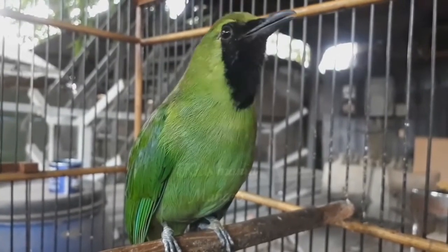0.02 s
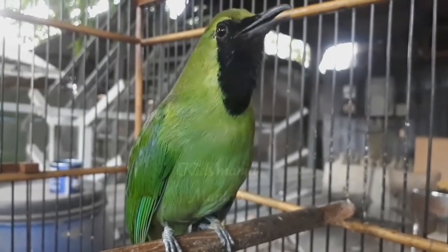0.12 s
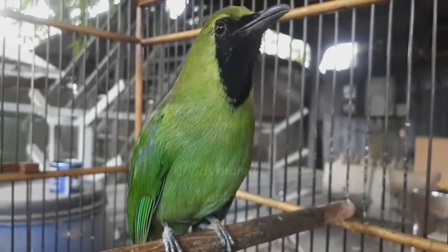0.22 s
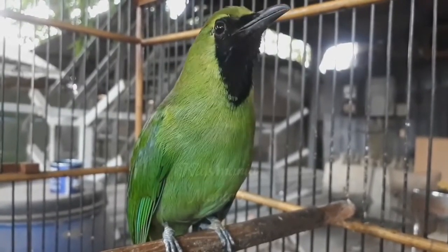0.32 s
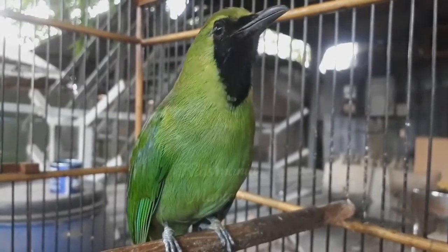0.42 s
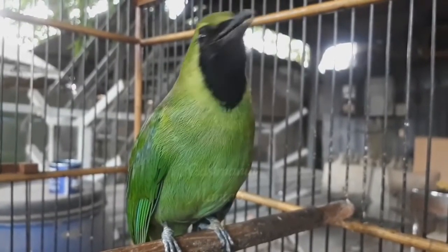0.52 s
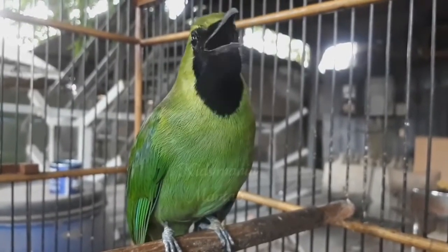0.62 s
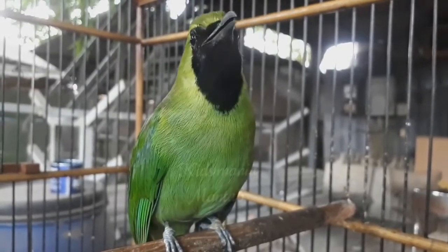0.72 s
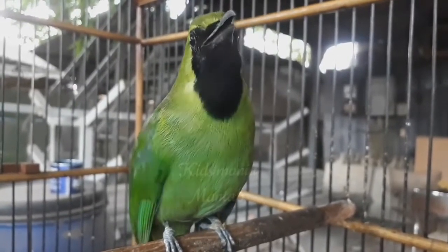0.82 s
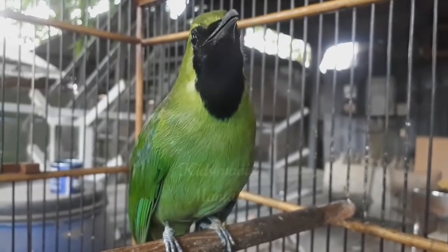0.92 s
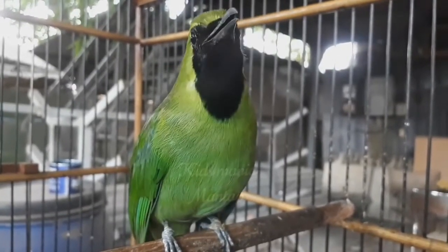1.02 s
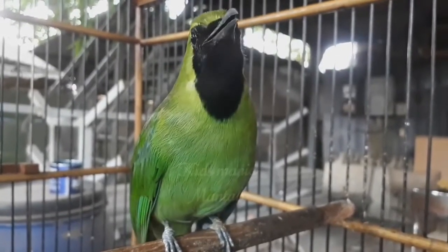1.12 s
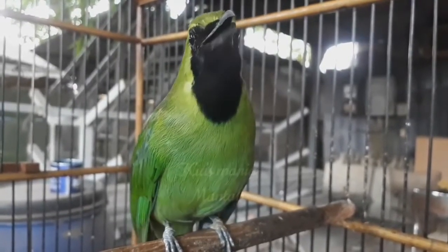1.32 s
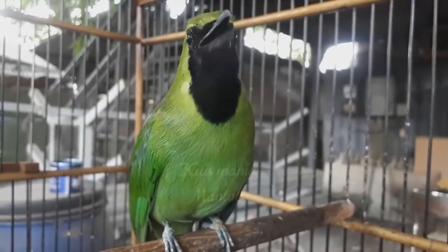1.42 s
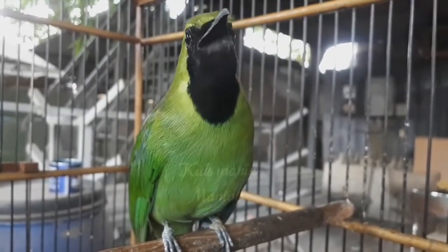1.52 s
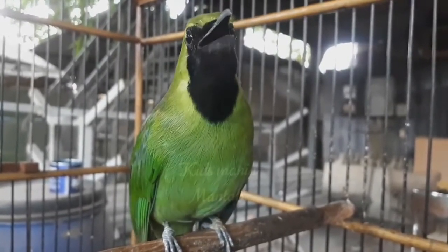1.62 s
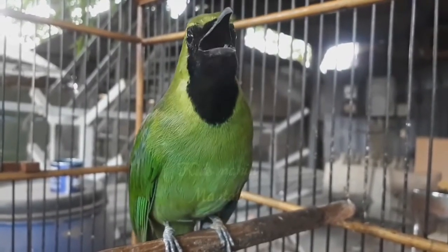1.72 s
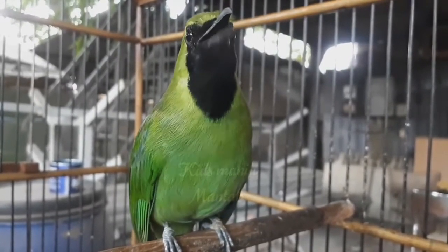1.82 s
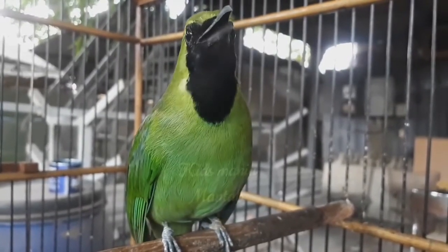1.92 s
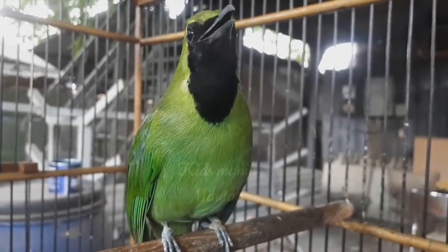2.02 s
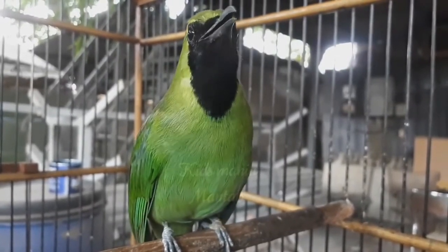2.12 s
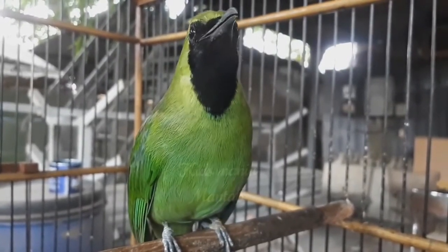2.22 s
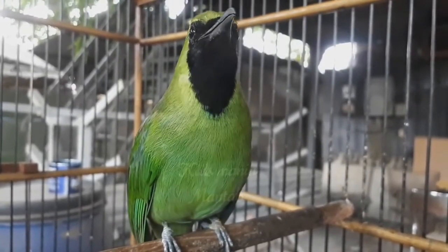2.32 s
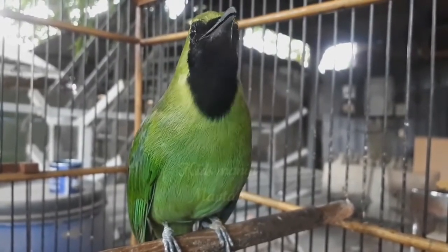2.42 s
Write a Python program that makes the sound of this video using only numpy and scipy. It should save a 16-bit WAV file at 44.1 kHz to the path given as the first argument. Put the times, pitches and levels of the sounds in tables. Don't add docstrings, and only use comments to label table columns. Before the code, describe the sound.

A songbird close to the microphone gives a tick and a clear falling whistle, pauses, buzzes briefly, then sings short whistles, chirpy double notes and rapid bright chatter; light room echo and quiet low hum behind.

```python
import sys
import numpy as np
from scipy import signal
from scipy.fft import rfft, irfft
from scipy.io import wavfile
from scipy.ndimage import uniform_filter1d, minimum_filter1d

SR = 44100
rng = np.random.default_rng(int(sys.argv[2]) if len(sys.argv) > 2 else 0)


def transcribe(signal):
    frames = np.atleast_2d(signal).T
    limited = np.clip(frames, -1, 1)
    pcm = np.round(limited * 32767).astype(np.int16)
    wavfile.write(sys.argv[1], SR, pcm)


def volts(x):
    e = np.asarray(x, float) / 20
    return 10 ** e


N = 108045
T = np.arange(N) / SR
TOP_HZ = 15700


def unit(x):
    return x / np.sqrt(np.mean(x ** 2))


def band(x, lo_hz, hi_hz):
    return signal.sosfilt(signal.butter(2, [lo_hz, hi_hz], "band", fs=SR, output="sos"), x)


def walk(rate):
    k = int(SR / rate)
    return unit(uniform_filter1d(uniform_filter1d(rng.standard_normal(N), k), k))


# (time [s], level [dB])
BEAK_OPENING = [(.2, -4), (.7, 0.5), (.82, 0), (.95, 0), (1.09, -1), (1.2, -4), (1.3, -1.5), (1.4, 6),
                (1.5, 2), (1.6, -2.5), (1.71, -1), (1.81, -1), (1.91, -1), (2.03, -6.5), (2.1, -2.5),
                (2.17, 2.5)]


def gape():
    s, db = np.array(BEAK_OPENING).T
    return volts(np.interp(T, s, db))


# (pitch [Hz], level [dB])
OVERTONE_COLOUR = [(3800, -1), (4900, -10.5), (6300, -3.5), (9800, 0), (10900, 0), (12000, -2), (13500, -2.5),
                   (15000, -13)]
OVERTONES_DB = [-21.5, -34, -32.5, -25.5, -33.5, -38.5, -36]


def stroke(rows, bend_hz, overtones_db=OVERTONES_DB):
    throat_hz, throat_db_per_hz, edge_s = 2400, .011, 0.0027
    s, line_hz, line_db = np.array(rows, float).T
    k = int(0.00071 * SR)
    centre_hz = np.interp(T, s, line_hz)
    level_db = uniform_filter1d(np.interp(T, s, line_db), k)
    off_resonance = np.tanh(2 * np.log2(centre_hz / throat_hz))
    edges = np.clip(np.minimum(T - s[0], s[-1] - T) / edge_s + .5, 0, 1) ** 2
    env = volts(level_db - throat_db_per_hz * bend_hz * off_resonance) * edges

    hz = uniform_filter1d(centre_hz, k) + bend_hz
    phase = 2 * np.pi * np.cumsum(hz) / SR
    colour_hz, colour_db = np.array(OVERTONE_COLOUR).T
    overtones = 0
    for multiple, db in enumerate(overtones_db, 2):
        colour = volts(db + np.interp(multiple * hz, colour_hz, colour_db))
        overtones += colour * np.sin(multiple * phase + multiple - 2) * (multiple * hz < TOP_HZ)
    tone = np.sin(phase) + env ** 0.37 * gape() * overtones
    return np.array([env * tone, env])


# (time [s], pitch [Hz], level [dB])
OPENING_WHISTLE = [(.203, 2440, -15), (.228, 2190, -2), (.255, 2030, -2.5), (.272, 1964, -2),
                   (.30, 1927, -5.5), (.309, 1990, -23)]


def opening():
    return stroke(OPENING_WHISTLE, 4 * walk(100))


# (time [s], pitch [Hz], level [dB])
CLEAR_WHISTLES = [
    [(.943, 2968, -8.5), (.948, 2905, -5), (.953, 2623, -3), (.961, 2421, -4.5), (.974, 2210, -0.5),
     (.984, 2045, -9.5), (.988, 1884, -18)],
    [(1.062, 2160, -23), (1.07, 2136, -14), (1.078, 2105, -7), (1.096, 1952, -5), (1.108, 1614, -19.5)],
    [(1.169, 1963, -17), (1.182, 2058, -5.5), (1.197, 1865, -3), (1.209, 1650, -14)],
    [(2.05, 1602, -27), (2.085, 1754, -12), (2.095, 1850, -8), (2.12, 1924, -6), (2.13, 1918, -5.5),
     (2.142, 1880, -7.5), (2.152, 1660, -15.5), (2.163, 1385, -22)],
    [(2.153, 3083, -17.5), (2.168, 2660, -7), (2.174, 2505, -4.5), (2.2, 2279, -9.5)],
]


def whistles():
    return volts(0.72 * walk(150)) * sum(stroke(rows, 8 * walk(150)) for rows in CLEAR_WHISTLES)


# (start [s], a crest [s], end [s], depth [Hz])
FLUTTER_BOUTS = [
    (.722, .7645, .825, 300),
    (1.285, 1.294, 1.318, 100),
    (1.383, 1.391, 1.41, 230),
    (1.482, 1.4905, 1.509, 270),
    (1.598, 1.605, 1.624, 160),
    (1.705, 1.715, 1.733, 120),
    (2.0345, 2.0405, 2.064, 380),
]


def flutter():
    rate_hz, ramp_s = 113, .006
    bend_hz = 0
    for start, crest, end, depth_hz in FLUTTER_BOUTS:
        fade = np.clip(np.minimum(T - start, end - T) / ramp_s, 0, 1)
        bend_hz = bend_hz + depth_hz * fade * np.cos(2 * np.pi * rate_hz * (T - crest))
    return bend_hz


# (start time [s], pitch [Hz], climb [Hz per s], peak level [dB])
CHATTER_FLICKS = [
    (1.571, 2140, 109400, -6.5),
    (1.669, 2305, 95200, -3),
    (1.782, 2350, 134000, -6.5),
    (1.881, 2640, 83600, -5.5),
]


def flicks():
    peak_s, length_s = 0.0033, 0.03
    lines = []
    for s, hz, climb, db in CHATTER_FLICKS:
        start = (s, hz, db - 8.5)
        peak = (s + peak_s, hz + climb * peak_s, db)
        end = (s + length_s, hz + climb * length_s, db - 36.5)
        lines.append([start, peak, end])
    return lines


# (time [s], pitch [Hz], level [dB])
BUZZ_VOICES = [
    [(.701, 2604, -14), (.706, 3250, -10), (.710, 3370, -10), (.715, 3805, -7.5), (.722, 4890, -21.5),
     (.733, 3765, -13.5), (.738, 3338, -14), (.742, 2960, -8), (.762, 3165, -6), (.79, 3404, -7),
     (.815, 3140, -8)],
    [(.700, 1700, -39), (.711, 2140, -21.5), (.717, 2603, -8.5), (.7205, 2476, -13.5), (.7245, 2890, -7.5),
     (.733, 2286, -24.5), (.75, 1952, -29.5), (.765, 2296, -21), (.785, 2815, -5), (.813, 2500, -27)],
    [(.922, 3085, -38), (.931, 3850, -27.5), (.938, 3420, -15), (.943, 3150, -19.5)],
    [(.161, 2500, -28.5), (.168, 2490, -36)],
]
# (time [s], pitch [Hz], level [dB])
DUET_VOICES = [
    [(1.283, 1650, -15.5), (1.294, 1893, -5), (1.31, 1602, -6.5), (1.318, 1430, -16.5)],
    [(1.276, 2000, -27), (1.283, 2660, -26.5), (1.295, 2610, -50), (1.304, 2700, -38), (1.312, 3100, -27.5),
     (1.321, 2500, -23)],
    [(1.373, 2034, -15), (1.383, 2636, -5.5), (1.389, 2890, -13.5), (1.402, 2780, -16.5),
     (1.406, 2600, -16), (1.411, 2243, -6), (1.419, 1755, -14.5)],
    [(1.378, 1300, -39), (1.39, 1583, -13.5), (1.401, 1600, -15.5), (1.414, 1220, -35)],
    [(1.472, 1900, -17), (1.478, 2320, -6), (1.488, 3075, -9.5), (1.504, 2970, -16.5), (1.509, 2560, 1.5),
     (1.516, 1940, -13.5)],
    [(1.482, 1300, -31), (1.49, 1677, -18), (1.502, 1570, -16), (1.512, 1200, -41)],
]
# (time [s], pitch [Hz], level [dB])
CHATTER_ARCHES = [
    [(1.576, 1407, -33), (1.585, 2326, -4), (1.592, 2090, -15), (1.615, 1450, -31)],
    [(1.68, 1528, -32.5), (1.69, 2335, -9.5), (1.697, 1775, -28), (1.71, 1460, -37)],
    [(1.789, 1500, -45), (1.796, 2705, 0), (1.802, 3206, -7.5), (1.809, 2774, 0.5), (1.822, 1835, -24)],
    [(1.888, 1917, -27), (1.894, 2803, 2), (1.897, 3025, -1.5), (1.905, 2656, -7.5), (1.910, 2120, -12.5)],
]
# (time [s], pitch [Hz], level [dB])
CHATTER_FALLS = [
    [(1.595, 3800, -21), (1.60, 3050, -4.5), (1.611, 2616, -2.5), (1.618, 2420, -13), (1.623, 2180, -19)],
    [(1.694, 4500, -15), (1.699, 3515, -14.5), (1.706, 2937, 0), (1.716, 2755, -1.5), (1.724, 2774, -11.5),
     (1.732, 2330, -16.5)],
    [(1.812, 4500, -25.5), (1.822, 3470, -8.5), (1.828, 3036, -5), (1.836, 3030, -13.5), (1.843, 2880, -20)],
    [(1.906, 4446, -24), (1.914, 3564, -8.5), (1.920, 2772, 2.5), (1.924, 2500, -2), (1.929, 3053, -8.5),
     (1.936, 1950, -23.5)],
    [(2.005, 1804, -28), (2.011, 2200, -16.5), (2.016, 2343, -5), (2.03, 2450, -4.5), (2.036, 2537, -7.5),
     (2.044, 2810, 2), (2.05, 2757, -17.5), (2.058, 2980, -7)],
]


def chatter():
    bend_hz = flutter()
    lines = BUZZ_VOICES + DUET_VOICES + flicks() + CHATTER_ARCHES + CHATTER_FALLS
    return sum(volts(1.6 * walk(390)) * stroke(rows, bend_hz + 40 * walk(400)) for rows in lines)


def breath(opening_env, whistle_env, chatter_env):
    noise = rng.standard_normal((3, N))
    noise = noise[0] + 0.55 * noise[1:]
    air = 0
    for lo, hi, db in [(5000, 7900, -3.5), (6830, 9850, -3.5), (9830, 11700, -9.5),
                       (11900, 13300, -5.5), (13500, 15200, -10.5)]:
        hiss = unit(band(band(noise, lo, hi), lo, hi))
        air = air + volts(db + 0.94 * walk(30)) * hiss
    air = gape() * air
    throat = noise
    for _ in range(3):
        throat = band(throat, 450, 4000)
    throat = unit(throat)
    air_effort = volts(-47.5) * opening_env + volts(-36) * whistle_env + volts(-34.5) * chatter_env
    throat_effort = volts(-43.5) * whistle_env + volts(-40) * chatter_env
    return air_effort * air + throat_effort * throat


# (time [s], level [dB])
BEAK_TICKS = [(.149, -20.5), (0.688, -20), (.696, -21), (0.913, -27.5), (0.929, -30.5), (1.055, -32),
              (1.156, -25.5), (1.266, -24), (1.365, -17), (1.464, -20.5), (1.560, -21), (1.662, -25.5),
              (1.773, -23.5), (2.001, -21), (2.267, -31)]
TICK_THUMPS = [
    .26,
    1.343,
    2.268,
]


def taps():
    ticks, knocks = np.zeros((2, N))
    s, db = np.array(BEAK_TICKS).T
    ticks[(s * SR).astype(int)] = volts(db)
    knocks[(np.array(TICK_THUMPS) * SR).astype(int)] = volts(-46.0)
    t = T[:3000]
    tick = np.exp(-t / 0.0022) * rng.standard_normal(len(t))
    knock = np.exp(-t / 0.025) * np.sin(2 * np.pi * 570 * t)
    dull_ticks = band(band(np.convolve(ticks, tick)[:N], 500, 3000), 320, 3500)
    return dull_ticks + np.convolve(knocks, knock)[:N]


def bird():
    pure, clear, busy = opening(), whistles(), chatter()
    rasp = breath(pure[1], clear[1], busy[1])
    return pure[0] + clear[0] + busy[0] + rasp + taps()


def room(x):
    early_db, early_t60_s = -11.5, 0.13
    tail_db, tail_t60_s = -24, 0.68
    t = T[:int(.9 * SR)]
    early = volts(early_db) * volts(-60 * t / early_t60_s) / np.sqrt(early_t60_s)
    tail = volts(tail_db) * volts(-60 * t / tail_t60_s) / np.sqrt(tail_t60_s)
    onset = np.clip(t / 0.0051, 0, 1) ** 2
    grain = band(rng.standard_normal((2, len(t))), 250, 8300)
    echo = grain * (early + tail) * onset * np.sqrt(14 / SR)
    return signal.fftconvolve(x[None], echo, axes=1)[:, :N]


# (time [s], pitch [Hz], level [dB])
DOVE_COO = [(2.081, 760, -70), (2.172, 691, -42.5), (2.259, 784, -48.5), (2.45, 782, -59)]


def dove():
    return stroke(DOVE_COO, 12 * walk(93), [])[0] * volts(8 * walk(48) - 9.5)


# (pitch [Hz], level [dB])
ROOM_TONE = [(40, -16.5), (100, -11), (200, -14.5), (500, -22.5), (1500, -33), (5000, -40), (15000, -59.5)]


def home():
    f = np.fft.rfftfreq(N, 1 / SR) + 1
    hz, db = np.array(ROOM_TONE).T
    gain = volts(np.interp(np.log(f), np.log(hz), db)) * np.clip(f / 42, 0, 1) ** 4
    mid, side = rfft(rng.standard_normal((2, N))) * gain
    side = side * np.clip(f / 600, .22, 1)
    noise = unit(irfft(np.array([mid + side, mid - side]), N))
    swell_db = 1 * (T - 0.45) + 0.8 * walk(1.5)
    tone = volts(-52.5 + swell_db) * noise
    hum = volts(-56.5) * unit(band(rng.standard_normal(N), 138, 152))
    low_hum = volts(-59.5) * unit(band(rng.standard_normal(N), 130, 136))
    ring = volts(-54.5 - 41 * T) * unit(band(rng.standard_normal((2, N)), 1600, 2055))
    return tone + hum + low_hum + ring


def scene():
    lag_s, lag_growth_hz = .000115, 60000
    song = bird()
    f = np.fft.rfftfreq(N, 1 / SR)
    delay = np.exp(-2j * np.pi * f * lag_s * (1 + f / lag_growth_hz))
    right = irfft(rfft(song[1]) * delay, N)
    direct = np.array([song[0], volts(0.53) * right])
    return direct + room(song[0]) + home() + dove()


def low_pass(x):
    return signal.sosfilt(signal.butter(12, 16470, fs=SR, output="sos"), x)


def record(dry):
    ceiling, k = .9, int(.003 * SR)
    peak = np.abs(dry).max(axis=0) + 1 / N
    gain = minimum_filter1d(np.minimum(1, ceiling / peak), 2 * k)
    gain = uniform_filter1d(gain, k)
    top_cut = signal.ellip(8, .2, 70, TOP_HZ, fs=SR, output="sos")
    mix = signal.sosfilt(top_cut, dry * gain)
    return low_pass(mix)


dry = scene()
out = record(dry)
transcribe(out)
```